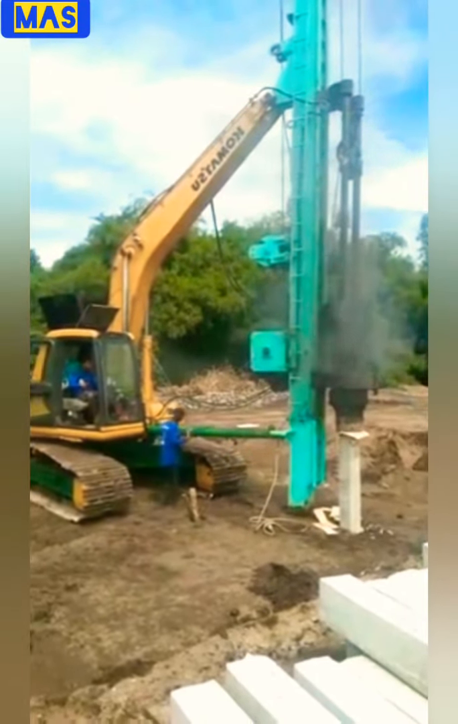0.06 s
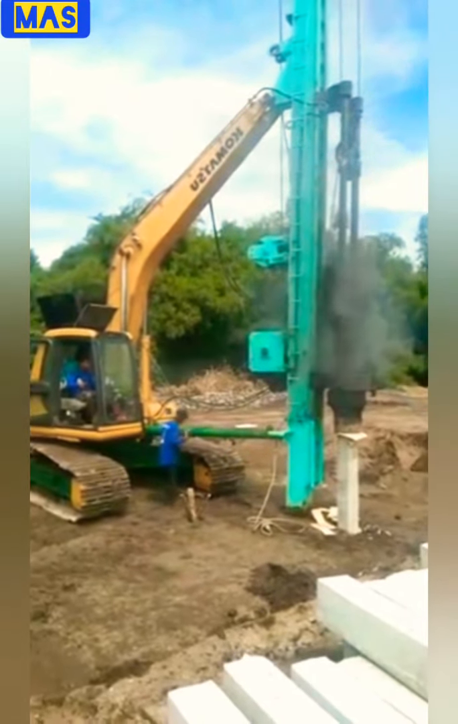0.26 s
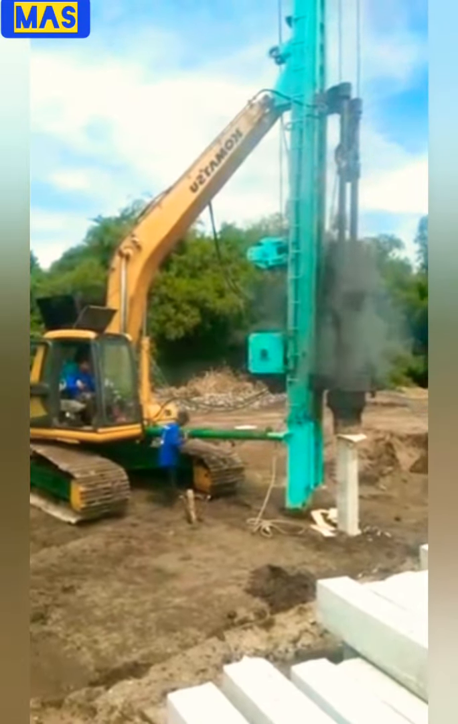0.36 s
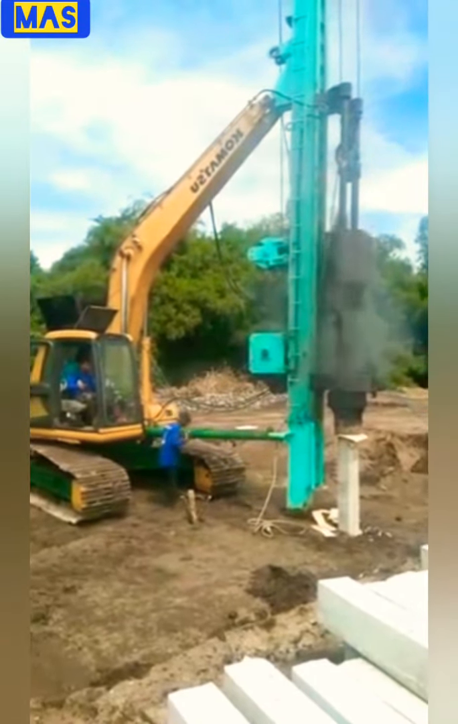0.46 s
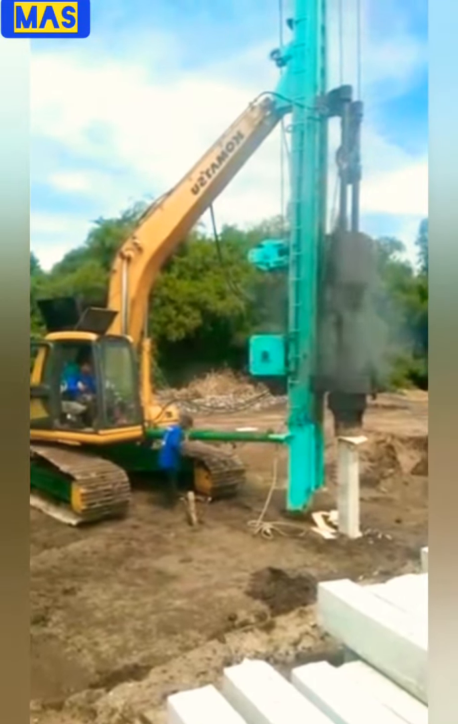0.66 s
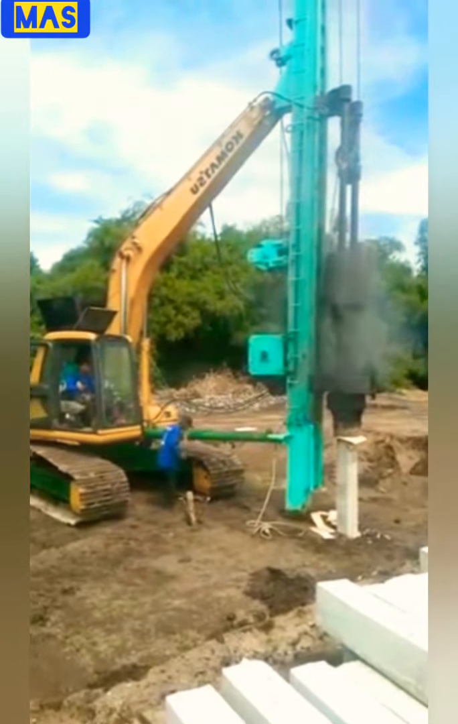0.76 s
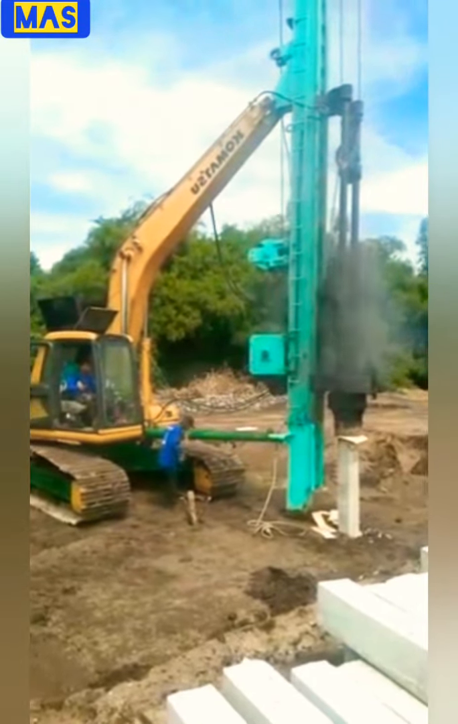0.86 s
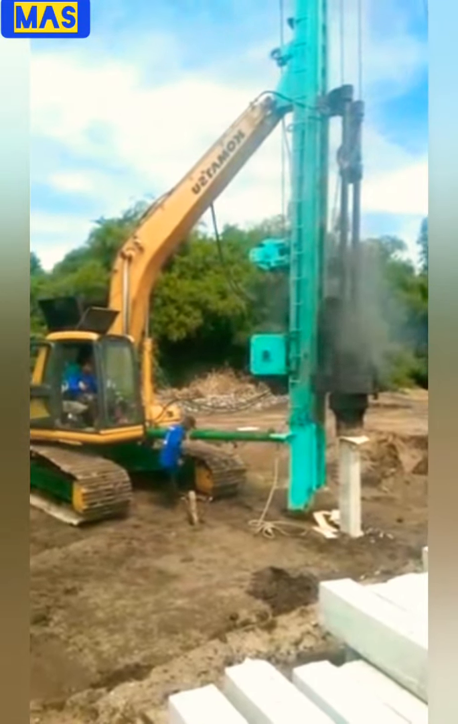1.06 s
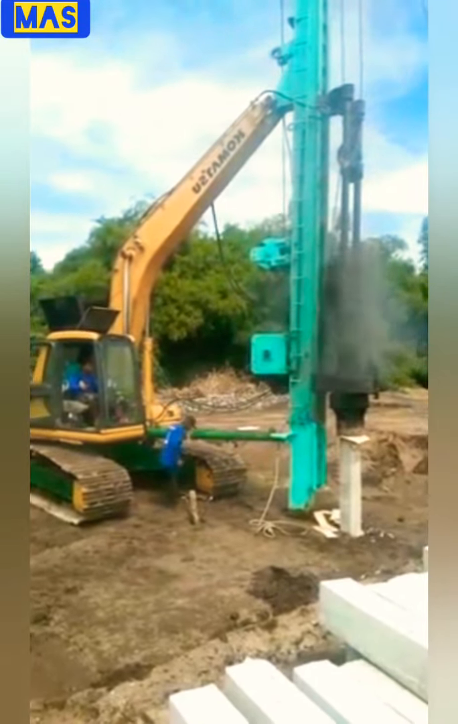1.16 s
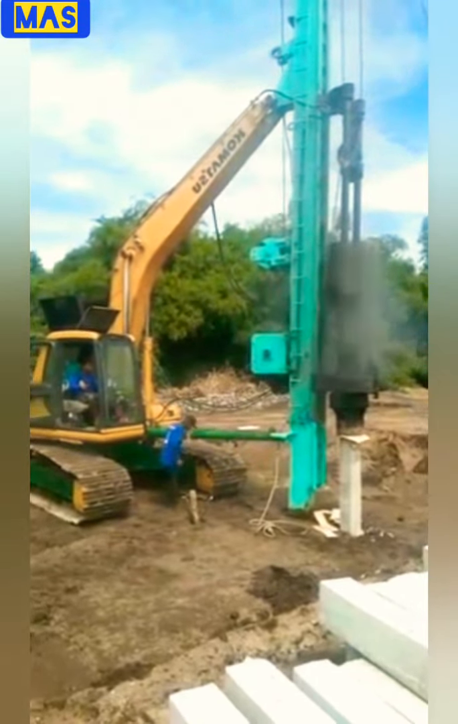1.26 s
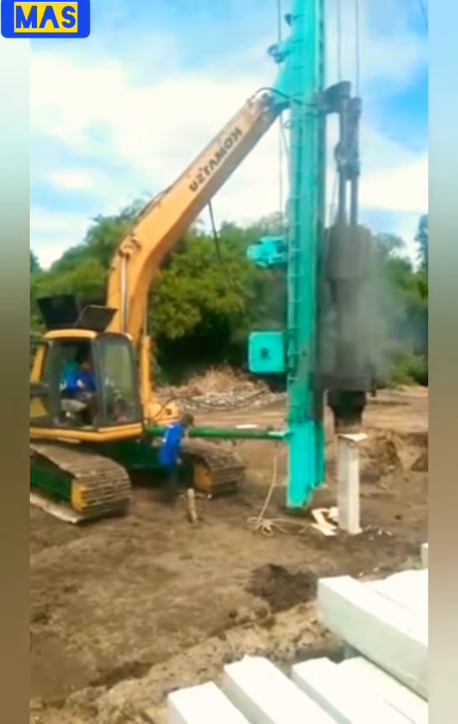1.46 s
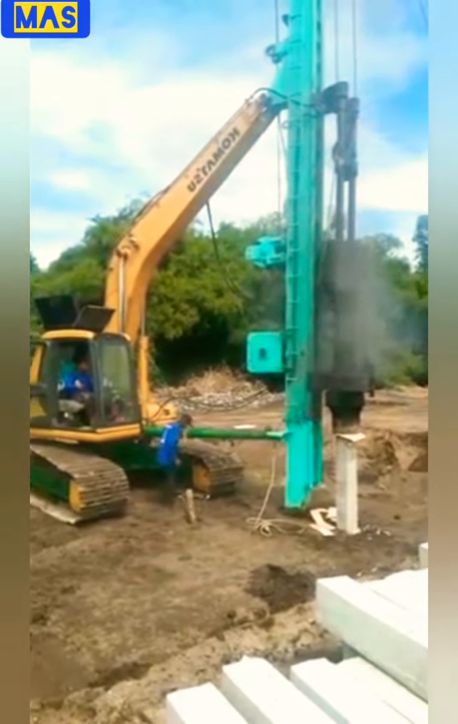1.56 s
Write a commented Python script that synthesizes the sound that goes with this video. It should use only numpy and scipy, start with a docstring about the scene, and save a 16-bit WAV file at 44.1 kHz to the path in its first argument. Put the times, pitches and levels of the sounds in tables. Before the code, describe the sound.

Two hard, clanging pile-driver strokes, each ending in a low gassy boom, above a faint excavator engine

```python
"""A diesel hammer drives a concrete pile, two strokes, over the drone of an excavator engine.
In each stroke the falling ram clacks in its cylinder and hits the anvil with a bright clink of rough tones;
the charge fires as a lumpy noise blast that rings the steel frame; the exhaust ports spit coloured noise,
and the gas booms in low gliding sines. Thin high chirps, dull thuds and faint echoes fill in around it.
The engine is a wavering tone, pulsing clatter and hiss; the loudest moments overload a mono microphone."""
import sys
import numpy as np
from scipy import signal
from scipy.fft import rfft, irfft
from scipy.io import wavfile
from scipy.ndimage import uniform_filter1d

SR = 44100
rng = np.random.default_rng(int(sys.argv[2]) if len(sys.argv) > 2 else 0)


def to_wav(s):
    """Save 16-bit WAV."""
    ch = np.atleast_2d(s).T  # columns
    pcm = np.round(np.clip(ch, -1, 1) * 32767)  # PCM
    wavfile.write(sys.argv[1], SR, pcm.astype(np.int16))


N = 70560  # 1.6 s

# Levels inside a source are relative to the level of its event. A t60 is the time to fall by 60 dB.

# The falling ram knocks in its cylinder, then slaps it. Each row: start in seconds, level in dB,
# time until the slap in seconds, ringing of the cylinder in dB.
RAM_CLACKS = [(0.105, -20, 0.0085, 3), (0.9869, -23, 0.0089, -4)]
# Modes of the cylinder. Each row: pitch in Hz, level in dB, t60 in seconds.
CYLINDER_MODES = [(426.6, -2.5, 0.055), (865, -6, 0.07), (1523, -5.5, 0.092), (2250, -11, 0.12),
                  (2660, -12, 0.043)]
# Spectrum of the scrape in a clack. Each row: frequency in Hz, gain in dB.
SCRAPE_SPECTRUM = [(70, 1), (200, 0), (430, 0.5), (570, -2), (800, -0.5), (1200, -3), (1550, 5.5),
                   (2450, 2.5), (3300, -7), (4600, -4.5), (7500, -10.5), (16000, -38)]

# The ram hits the anvil. Each row: start in seconds, level in dB, settled pitch of the main ring in Hz,
# its start above that pitch in Hz, level of the other modes in dB, crack in dB, sizzle in dB.
ANVIL_STRIKES = [(0.2009, -4, 4073, 1020, 4, -18, -12), (1.081, -3, 4070, 306, -7.5, -11.5, -14)]
# The anvil's other modes. Each row: mean pitch in Hz, level in dB, t60 in seconds.
ANVIL_MODES = [(2470, -11.5, 0.096), (4700, -16, 0.077), (5130, -13, 0.021), (6440, -12.5, 0.018),
               (7200, -14, 0.032), (7870, -6.5, 0.018)]
# Spectrum of crack and sizzle. Each row: frequency in Hz, gain in dB.
CRACK_SPECTRUM = [(200, -11), (900, -1.5), (1800, 0), (2600, 5.5), (3400, -6), (4400, 6), (5500, 0.5),
                  (7500, 1.5), (16000, -29)]
# Brief, thin high chirps around the anvil strike and the bang. Each row: start in seconds, level in dB,
# hold in seconds, mean pitch in Hz.
HIGH_CHIRPS = [(0.289, -28, 0.0084, 7900), (1.0776, -10, 0.0005, 5980), (1.108, -11, 0.002, 6560)]

# The charge fires and shakes the frame, which rattles again a moment later. Each row: start in seconds,
# level in dB, ringing of the frame in dB, time held until it is damped in seconds.
CHARGE_BANGS = [(0.2384, -7.5, 3.5, 0.13), (0.287, -16.5, -19, 0.012), (1.1073, -6.5, 2.5, 0.13),
                (1.157, -16.5, -2, 0.013)]
# Spectrum of the blast. Each row: frequency in Hz, gain in dB.
BLAST_SPECTRUM = [(100, -10), (230, -7), (430, 4), (560, -13.5), (730, 2.5), (1020, -2.5), (1250, -8.5),
                  (1550, -4.5), (2000, 4), (2350, 2.5), (2850, -1.5), (3500, -2.5), (4150, -2.5),
                  (5700, -3.5), (6600, 1), (8000, -10), (16000, -29)]
# Decay of the blast before the final damping. Each row: frequency in Hz, t60 in seconds.
BLAST_DECAY = [(300, 1), (900, 0.56), (2200, 0.36), (4500, 0.19), (12000, 0.11)]
# Modes of the steel frame. Each row: mean pitch in Hz, level in dB, t60 in seconds before the final damping.
FRAME_MODES = [(326, -18.5, 0.5), (416.6, -18, 1), (701, -14, 0.24), (759, -17.5, 0.32), (807, -22.5, 1),
               (974, -15.5, 0.27), (1030, -13, 0.14), (1352, -16, 0.2), (2213, -10, 0.25),
               (2690, -8.5, 0.18), (2848, -17, 0.23), (4390, -17.5, 0.28), (5226, -17.5, 0.17),
               (6480, -23, 0.17)]

# Gas spits from the exhaust ports. Each row: opening in seconds, level in dB, hold in seconds,
# leak before the ports open in dB.
PORT_SPITS = [(0.3531, -5.5, 0.0051, -7.5), (0.42, -25, 0.0056, -12.5), (0.463, -40, 0.003, -2),
              (1.2268, -7, 0.0041, -4.5), (1.301, -26, 0.0016, -19), (1.341, -40.5, 0.004, -3.5)]
# Spectrum of the spitting gas. Each row: frequency in Hz, gain in dB.
SPIT_SPECTRUM = [(120, -14), (280, 6), (560, -16), (800, -6.5), (1200, -13.5), (1800, -12), (2280, 0.5),
                 (2800, -19.5), (3800, -10.5), (4500, -3), (5300, -8), (7300, 2.5), (8500, -9.5),
                 (16000, -25)]
# The gas in the cylinder booms, its pitch rising. Each row: start in seconds, level in dB, rise in seconds,
# hold in seconds, collapse in seconds, starting pitch in Hz.
GAS_BOOMS = [(0.358, -5, 0.01, 0.001, 0.065, 94), (0.403, -23, 0.0072, 0.004, 0.05, 126),
             (0.425, -13, 0.015, 0.0086, 0.091, 98.6), (0.515, -28, 0.015, 0.0026, 0.092, 109),
             (1.231, -6, 0.0059, 0.001, 0.065, 97), (1.276, -23, 0.0099, 0.0065, 0.038, 120),
             (1.303, -14.5, 0.012, 0.011, 0.07, 100), (1.385, -29, 0.014, 0.0083, 0.1, 103)]

# Dull low thuds in the background. Each row: start in seconds, level in dB, pitch in Hz.
DULL_THUDS = [(0.635, -28, 59.5), (1.135, -26, 61), (1.584, -23, 81.5)]

# Echoes on open ground with machinery and trees around. Each row: frequency in Hz, t60 in seconds.
SITE_DECAY = [(150, 0.71), (600, 1), (2500, 0.097), (9000, 0.23)]

# Level moves of the engine. Each row: time in seconds, drone change in dB, hiss change in dB.
ENGINE_LEVEL_MOVES = [(0, -1.5, -3.5), (.65, 0, 0.5), (.92, -1, -4), (1.35, -4, 0.5), (1.6, -2.5, -0.5)]
# Spectrum of the engine clatter. Each row: frequency in Hz, gain in dB.
CLATTER_SPECTRUM = [(20, -20), (55, -5), (95, 1.5), (170, -9), (270, -8.5), (440, -11.5), (490, -16.5),
                    (600, -23), (790, -21), (1050, -16.5), (1500, -27), (2100, -21.5), (3000, -32),
                    (16000, -73)]
# Resonances of the engine housing. Each row: centre in Hz, half-width at half amplitude in Hz,
# rms level in dB before the level moves.
HOUSING_RESONANCES = [(394.2, 14.3, -43.5), (788, 25, -51)]
# Spectrum of the engine hiss. Each row: frequency in Hz, gain in dB.
HISS_SPECTRUM = [(1500, -32), (3000, -4.5), (5000, 0), (7400, 1), (16000, -33)]

# The microphone loses the top of the treble. Each row: frequency in Hz, gain in dB.
MICROPHONE_RESPONSE = [(8050, 0), (8700, -6.5), (11000, -8)]

CLACK_RISE_S, CLACK_T60_S = 0.0052, 0.15
CLACK_TAIL_DB, CLACK_TAIL_T60_S = -19, 1
SLAP_DB, SLAP_RISE_S, SLAP_T60_S = -0.5, 0.0017, 0.076
KNOCK_DB, KNOCK_HZ, KNOCK_T60_S = 3.5, 171, 0.049

STRIKE_RISE_S, STRIKE_HOLD_S, MAIN_T60_S = 0.0022, 0.0058, 0.022
SETTLE_S = 0.00141  # time constant of the main ring's fall in pitch
MAIN_WAVER, MODE_WAVER = 0.012, 0.0082  # rms, as a share of the pitch
CONTACT_DB, CONTACT_HZ, CONTACT_T60_S = -3, 1895, 0.0076
CRACK_T60_S, SIZZLE_T60_S = 0.023, 0.41
REBOUND_S, REBOUND_DB, REBOUND_T60_S = 0.0087, -13.5, 0.0085  # delay, level, decay

CHIRP_WAVER = 0.02  # rms, as a share of the pitch
CHIRP_RISE_S, CHIRP_T60_S = 0.0088, 0.011

BANG_RISE_S, VENT_T60_S = 0.0032, 0.082
RATTLES_PER_S, RATTLE_SHARE = 2400, 0.3  # share of the driving power
BANG_LUMPS_DB, BANG_PATCHES_DB = 0.5, 3  # rms
FRAME_WAVER_HZ = 5  # rms

SPIT_RISE_S, SPIT_T60_S = 0.0014, 0.036
SPIT_TAIL_DB, SPIT_TAIL_T60_S = -11.5, 0.066
LEAK_SWELL_S = 0.0072  # time constant

BOOM_TOP_HZ, BOOM_GLIDE_PER_RISE = 145.2, 2.1  # glide time constant in rise times
PUSH_DB, PUSH_HZ, PUSH_T60_S = -19, 58.4, 0.12
THUD_RISE_S, THUD_T60_S = 0.0092, 0.3

SITE_DB, SITE_BUILD_S = -23.5, 0.0097

# Engine levels are rms, ahead of the level moves.
FIRING_HZ, FIRING_DB, CLATTER_DB, HISS_DB = 86.8, -39.5, -35.5, -47.5
SPEED_WANDER, ENGINE_PULSING = 0.035, 0.19  # rms share of the pitch, depth on the clatter
HISS_FLUTTER_DB = 1.2  # rms

OVERLOAD = 0.94  # clipping level, full scale is 1
EDGE_HZ = 15850


def clack(db, slap_s, ring_db):
    """A low knock, a soft scrape of steel in steel, and a slap as the cylinder's ring reaches its peak."""
    shape = envelope(CLACK_RISE_S, 0, CLACK_T60_S)
    shape += amp(CLACK_TAIL_DB) * envelope(CLACK_RISE_S, 0, CLACK_TAIL_T60_S)
    add(shape, slap_s, amp(SLAP_DB) * envelope(SLAP_RISE_S, 0, SLAP_T60_S))
    scrape = noise(SCRAPE_SPECTRUM) * shape
    knock = amp(KNOCK_DB) * tone(KNOCK_HZ) * envelope(CLACK_RISE_S, 0, KNOCK_T60_S)
    ring = sum(amp(level) * tone(hz) * envelope(slap_s, 0, t60) for hz, level, t60 in CYLINDER_MODES)
    return amp(db) * (knock + scrape + amp(ring_db) * ring)


def strike(db, main_hz, sharp_hz, others_db, crack_db, sizzle_db):
    """Snap, crack and rebound; the anvil's rough ring starts sharp and settles over sizzling noise."""
    t = clock()
    snap_rise = STRIKE_RISE_S / 2
    contact = amp(CONTACT_DB) * np.sin(2 * np.pi * CONTACT_HZ * t) * envelope(snap_rise, 0, CONTACT_T60_S)

    pitch = main_hz * (1 + MAIN_WAVER * wander(500)) + sharp_hz * np.exp(-t / SETTLE_S)
    main = tone(pitch) * envelope(STRIKE_RISE_S, STRIKE_HOLD_S, MAIN_T60_S)
    others = np.zeros(N)
    for hz, level, t60 in ANVIL_MODES:
        rough_tone = tone(hz * (1 + MODE_WAVER * wander(160)))
        others += amp(level) * rough_tone * envelope(STRIKE_RISE_S, STRIKE_HOLD_S, t60)

    crack = amp(crack_db) * envelope(snap_rise, STRIKE_HOLD_S, CRACK_T60_S)
    add(crack, REBOUND_S, amp(REBOUND_DB) * envelope(snap_rise, 0, REBOUND_T60_S))
    sizzle = amp(sizzle_db) * envelope(STRIKE_RISE_S, 0, SIZZLE_T60_S)
    spray = np.hypot(crack, sizzle) * noise(CRACK_SPECTRUM)  # the two add in power
    return amp(db) * (contact + main + amp(others_db) * others + spray)


def bang(db, ring_db, length):
    """A lumpy blast with dense rattling, and the frame's modes ringing beside it until both are damped."""
    rattle = np.sqrt(RATTLE_SHARE) * grains(RATTLES_PER_S)
    rush = np.sqrt(1 - RATTLE_SHARE) * rng.standard_normal(N)
    drive = (rattle + rush) * amp(BANG_LUMPS_DB * wander(94))
    blast = evened(colour(patchy(drive, BANG_PATCHES_DB), BLAST_SPECTRUM))
    blast = die_away(blast, BLAST_DECAY)
    ring = np.zeros(N)
    for hz, level, t60 in FRAME_MODES:
        ring += amp(level) * tone(hz + FRAME_WAVER_HZ * wander(48)) * envelope(2 * BANG_RISE_S, 0, t60)
    return amp(db) * (blast + amp(ring_db) * ring) * envelope(BANG_RISE_S, length, VENT_T60_S)


def spit(s, db, hold, leak_db):
    """A leak swells, then the ports snap open in a burst that collapses as the pressure drops."""
    shape = amp(leak_db) * np.exp(-abs(clock() - s) / LEAK_SWELL_S)
    burst = envelope(SPIT_RISE_S, hold, SPIT_T60_S)
    tail = amp(SPIT_TAIL_DB) * envelope(SPIT_RISE_S, hold, SPIT_TAIL_T60_S)
    add(shape, s, np.maximum(burst, tail))
    return amp(db) * shape * noise(SPIT_SPECTRUM)


def boom(db, rise, hold, collapse, start_hz):
    """The gas column swings with rising pitch and dies ever faster, over a brief low push of air."""
    t = clock()
    hz = BOOM_TOP_HZ + (start_hz - BOOM_TOP_HZ) * np.exp(-t / (BOOM_GLIDE_PER_RISE * rise))
    falling = np.maximum(t - rise - hold, 0) / collapse
    shape = np.minimum(t / rise, 1) * np.exp(-np.log(1000) * falling ** 2)
    swing = -np.sin(2 * np.pi * np.cumsum(hz) / SR) * shape
    push = np.sin(2 * np.pi * PUSH_HZ * t) * envelope(rise, 0, PUSH_T60_S)
    return amp(db) * (swing + amp(PUSH_DB) * push)


def chirp(db, hold, hz):
    """A brief, thin high sine with an unsteady pitch."""
    note = tone(hz * (1 + CHIRP_WAVER * wander(280)))
    return amp(db) * note * envelope(CHIRP_RISE_S, hold, CHIRP_T60_S)


def thud(db, hz):
    """A soft low sine that swells in and dies away."""
    return amp(db) * np.sin(2 * np.pi * hz * clock()) * envelope(THUD_RISE_S, 0, THUD_T60_S)


def site(x):
    """Faint scattered echoes from machinery and trees: a decaying noise tail convolved with the sound."""
    tail = die_away(rng.standard_normal(N), SITE_DECAY) * np.minimum(clock() / SITE_BUILD_S, 1)
    return amp(SITE_DB) * signal.fftconvolve(x, tail / np.linalg.norm(tail))[:N]


def engine():
    """A wavering firing note, clatter that pulses with it, the housing's resonances and a fluttering hiss."""
    firing = tone(FIRING_HZ * (1 + SPEED_WANDER * wander(32)))
    clatter = evened(noise(CLATTER_SPECTRUM) * (1 + ENGINE_PULSING * firing))
    f = np.fft.rfftfreq(N, 1 / SR)
    housing = np.zeros(N)
    for hz, width, db in HOUSING_RESONANCES:
        peak = 1 / (1 + ((f - hz) / width) ** 2)
        housing += amp(db) * evened(irfft(rfft(rng.standard_normal(N)) * peak, N))

    s, drone_moves, hiss_moves = np.transpose(ENGINE_LEVEL_MOVES)
    drone = amp(FIRING_DB) * evened(firing) + amp(CLATTER_DB) * clatter + housing
    drone = drone * amp(np.interp(clock(), s, drone_moves))
    hiss_db = HISS_DB + np.interp(clock(), s, hiss_moves) + HISS_FLUTTER_DB * wander(46)
    return drone + amp(hiss_db) * noise(HISS_SPECTRUM)


def amp(db):
    """Decibels to gain."""
    return 10 ** (np.asarray(db) / 20)


def evened(x):
    """Scales to an rms of 1."""
    return x / np.sqrt(np.mean(x ** 2) + 1e-20)


def read(points, hz):
    """Reads a table on a log-frequency axis."""
    f, value = np.transpose(points)
    return np.interp(np.log(hz + 1), np.log(f + 1), value)


def add(mix, s, sound):
    """Mixes a sound in at a time in seconds, in place."""
    part = mix[max(round(s * SR), 0):][:len(sound)]
    part += sound[:len(part)]


def clock():
    """Seconds, sample by sample."""
    return np.arange(N) / SR


def colour(x, points):
    """Filters by a spectrum table, padded so the end does not wrap onto the start."""
    gain = amp(read(points, np.fft.rfftfreq(2 * N, 1 / SR)))
    return irfft(rfft(x, 2 * N) * gain)[:N]


def noise(points):
    """Noise of rms 1 with a given spectrum."""
    return evened(colour(rng.standard_normal(N), points))


def envelope(rise, hold, t60):
    """Straight attack, hold, exponential release."""
    t = clock()
    return np.minimum(t / rise, 1) * np.exp(-np.log(1000) * np.maximum(t - rise - hold, 0) / t60)


def die_away(x, decay):
    """Lets each frequency die at its own speed."""
    hz, t, z = signal.stft(x, SR, nperseg=256)
    fall = np.exp(-np.log(1000) * t / read(decay, hz)[:, None])
    return signal.istft(z * fall, SR)[1][:N]


def tone(hz):
    """A sine of random phase on a steady or moving pitch."""
    return np.sin(2 * np.pi * (np.cumsum(hz * np.ones(N)) / SR + rng.random()))


def wander(rate_hz):
    """Random motion of rms 1 that thins out steeply above a rate."""
    hz = np.fft.rfftfreq(N, 1 / SR)
    weight = (hz > 0) / (1 + (hz / rate_hz) ** 4)
    return evened(irfft(rfft(rng.standard_normal(N)) * weight, N))


def patchy(x, db):
    """Narrow bands swell and fade at random, each for a few hundredths of a second."""
    z = signal.stft(x, nperseg=512)[2]
    field = evened(uniform_filter1d(rng.standard_normal(z.shape), size=6, axis=1))
    return signal.istft(z * amp(db * field))[1][:N]


def grains(per_s):
    """A random train of tiny impacts, of rms 1."""
    return evened(rng.standard_normal(N) * (rng.random(N) < per_s / SR))


def scene():
    """The hammer, chirps and thuds with their echoes, and the engine, the same in both channels."""
    hammer = np.zeros(N)
    events = ((clack, RAM_CLACKS), (strike, ANVIL_STRIKES), (bang, CHARGE_BANGS),
              (chirp, HIGH_CHIRPS), (boom, GAS_BOOMS), (thud, DULL_THUDS))
    for source, table in events:
        for s, *row in table:
            add(hammer, s, source(*row))
    for row in PORT_SPITS:
        hammer += spit(*row)  # places itself, as its leak begins before the opening
    mono = hammer + site(hammer) + engine()
    return np.array([mono, mono])


def record(dry):
    """Microphone colour, hard overload on the loudest peaks, then a steep treble limit."""
    coloured = [colour(channel, MICROPHONE_RESPONSE) for channel in dry]
    clipped = np.clip(coloured, -OVERLOAD, OVERLOAD)
    lowpass = signal.firwin(511, EDGE_HZ, window=("kaiser", 9), fs=SR)
    return signal.oaconvolve(clipped, lowpass[None], "same")


dry = scene()
out = record(dry)
to_wav(out)
```